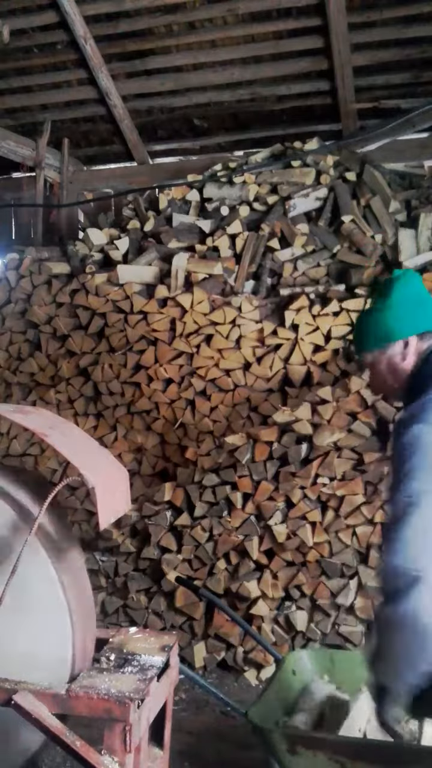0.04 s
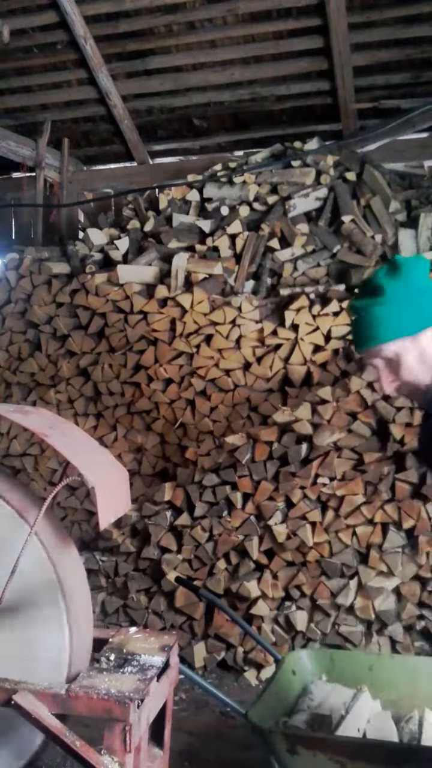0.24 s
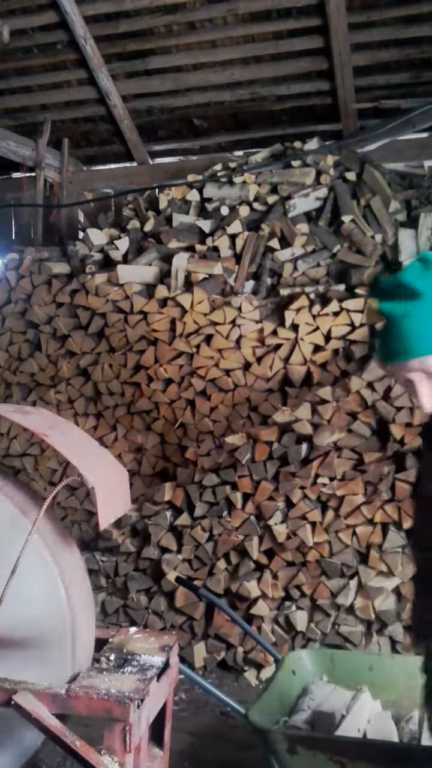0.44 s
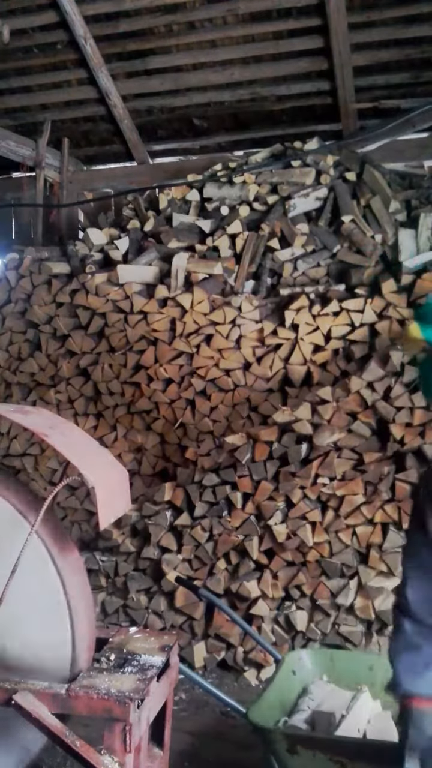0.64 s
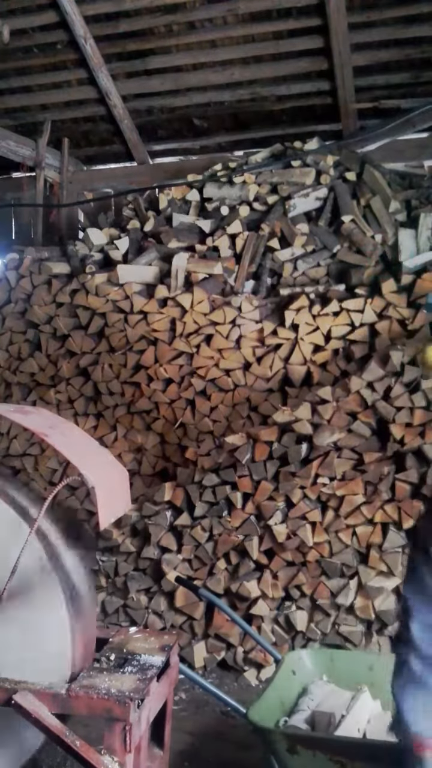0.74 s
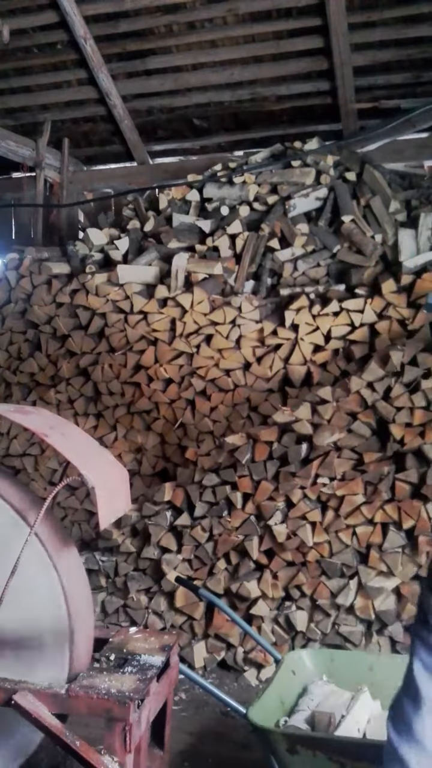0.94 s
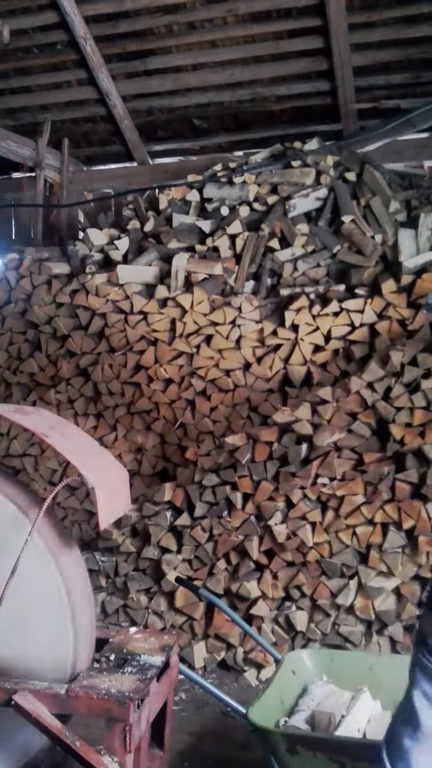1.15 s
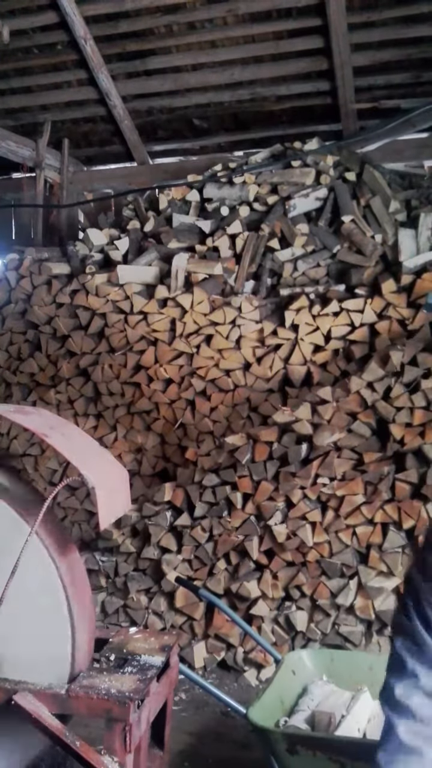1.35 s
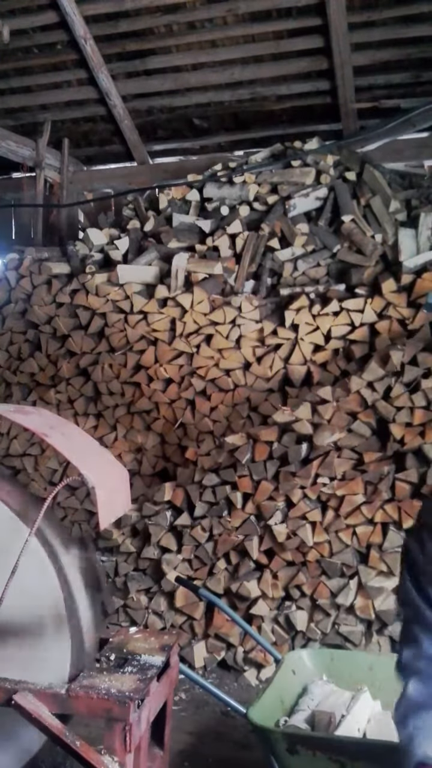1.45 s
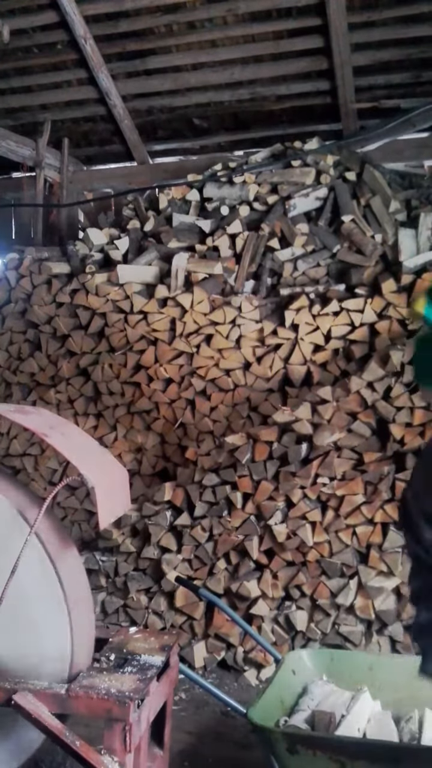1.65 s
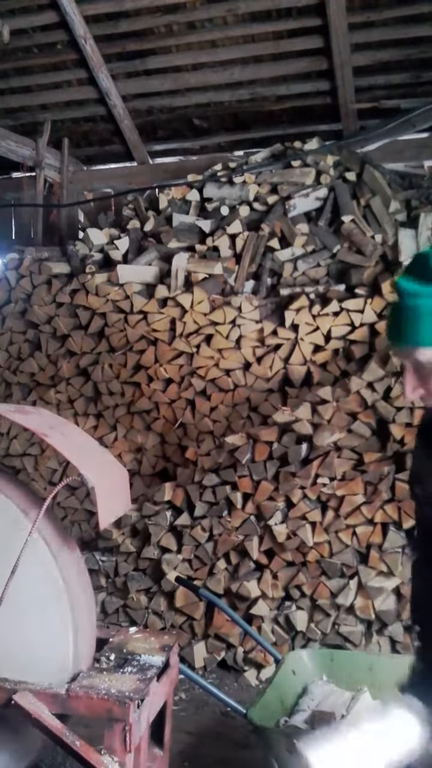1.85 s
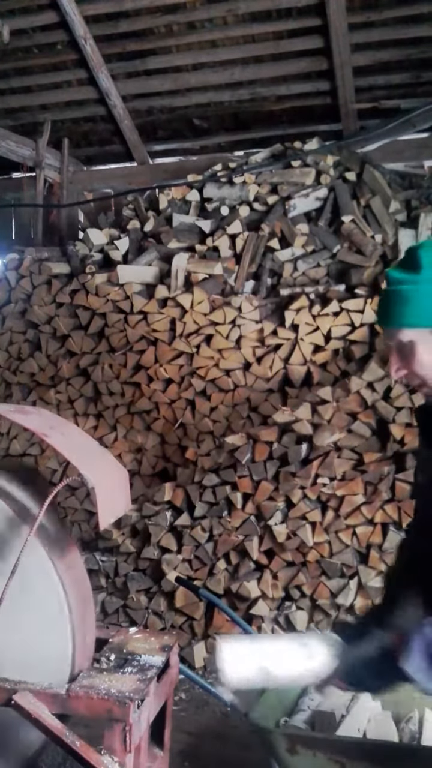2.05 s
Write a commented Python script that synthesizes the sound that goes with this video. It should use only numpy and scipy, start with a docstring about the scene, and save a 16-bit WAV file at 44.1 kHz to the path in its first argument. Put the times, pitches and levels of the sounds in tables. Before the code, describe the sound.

Split firewood tumbles into a wheelbarrow with a loud clatter, and the tray booms and rings out. A firewood machine idles quietly in the shed. Then come a sharp wooden knock, soft footsteps and a jacket rustle.

```python
"""A wooden shed: an armful of split firewood tumbles into a wheelbarrow. The logs clack,
their bark scrapes, and the struck tray booms and rings on. A firewood machine idles beside it:
belt and bearings rattle and ring its frame over a motor hum. The worker steps away on the
earth floor with a rustle of his jacket and a sharp knock of wood."""
import sys
import numpy as np
from scipy import signal
from scipy.fft import rfft, irfft
from scipy.io import wavfile
from scipy.ndimage import uniform_filter1d, minimum_filter1d

SR = 44100
rng = np.random.default_rng(int(sys.argv[2]) if len(sys.argv) > 2 else 0)


def generate_wav(sig):
    """Save sig (samples, or channels by samples) to the path in sys.argv[1] as 16-bit PCM at SR."""
    pcm = np.round(np.clip(np.atleast_2d(sig).T, -1, 1) * 32767).astype(np.int16)
    wavfile.write(sys.argv[1], SR, pcm)


N = 92610
T = np.arange(N) / SR

# belt and bearing spectrum: f/Hz, level/dB
WHIRR_SPECTRUM = [(30, -60), (60, -28), (100, -23), (160, -8), (450, -0.5), (720, -2), (1040, -4),
                  (1650, 0), (1850, -12.5), (2900, -28.5), (3550, -22.5), (4300, -35), (5800, -36.5),
                  (7800, -54), (20000, -73)]
# machine frame resonances: f/Hz, half width/Hz, level/dB
FRAME_MODES = [(458.7, 22.3, -6), (643.3, 11, -14), (720, 23, -12), (1161, 15, -11), (1271, 2.9, -9.5),
               (1591, 12, -12.5), (3503, 160, -26.5)]
# whirr and frame envelope: t/s, level/dB
IDLE_ENVELOPE = [(0, -44), (.45, -42), (.6, -39), (.75, -45.5), (.95, -44.5), (1.1, -41), (1.7, -39),
                 (2.1, -41.5)]
# logs landing: t/s, level/dB
LANDINGS = [(0.089, -21.5), (0.104, -12.5), (.111, -6), (.117, -7.5), (.130, -2.5), (.134, 3), (.141, 1.5),
            (.154, -2.5), (.163, -1.5), (.177, -5), (.186, -0.5), (0.1946, -5), (.203, -7.5), (.221, -6.5),
            (.231, -3), (0.258, -10), (.267, -8.5), (.277, -9), (.325, -14.5)]
# wood on tray: f/Hz, level/dB
CLATTER_SPECTRUM = [(60, -51), (120, -27), (250, -6.5), (480, -3), (700, -3.5), (1100, -4.5), (1450, 0),
                    (1700, -11), (2000, -26), (2500, -45), (3600, -36), (6000, -46), (16000, -68)]
# notes of colliding logs: t/s, f/Hz, level/dB
LOG_NOTES = [(.086, 1450, -15), (.130, 1890, -15.5), (.130, 1681, -14), (.175, 1468, -7.5),
             (.202, 1418, -6.5), (.221, 1471, -10), (.258, 1516, -12)]
# tray floor under heavy logs: t/s, f/Hz, level/dB
TRAY_BOOMS = [(.087, 176, -20), (.103, 290.4, -11.5), (.133, 516.7, -7.5), (.378, 167, -29)]
# tray modes: f/Hz, level/dB, t60/s
TRAY_MODES = [(166.7, -8.5, 0.47), (245.7, -12.5, 0.51), (269.4, -4.5, 0.724), (312, -7, 0.43),
              (407.3, 1, 1.35), (474.8, 7.5, 0.3), (506, 0, 0.4), (606, -8, 1.5), (763.3, 6.5, 0.89),
              (797, 0, 0.7), (929, -0.5, 0.51), (1400, 4, 0.64), (1462, 8, 0.47), (1596, 0, 0.29)]
# high tray resonances stirred by scraping: f/Hz, level/dB
SCRAPE_MODES = [(4060, -14.5), (4700, -16), (10500, -25)]
# logs sliding and settling: t/s, level/dB
SCRAPE_ENVELOPE = [(.078, -84), (.094, -51), (.145, -36.5), (.262, -40), (.32, -54.5), (.48, -65),
                   (.68, -74), (.9, -88)]
# bark friction: f/Hz, level/dB
BARK_SPECTRUM = [(1500, 5), (2700, 0.5), (3800, 4), (5700, -7.5), (8200, -8), (10300, -5.5), (13000, -20),
                 (16000, -23)]
# shed reverberation: f/Hz, t60/s
SHED_DECAY = [(100, 0.47), (400, 0.77), (1400, 0.38), (4000, 1), (10000, 0.22), (16000, 0.26)]
# bark rasp, a faint clink, then sleeve rasps: t/s, half length/s, f/Hz, half width/f, level/dB
RASP_EVENTS = [(.113, 0.019, 3340, 0.13, -40), (0.602, 0.012, 7200, .04, -72.5),
               (1.337, 0.014, 5760, 0.11, -62), (1.483, 0.0069, 9800, .06, -60),
               (1.577, 0.004, 10700, 0.11, -41.5), (1.682, 0.0099, 11100, .1, -60.5)]
# jacket rustle: t/s, level/dB
RUSTLE_ENVELOPE = [(1.15, -100), (1.34, -66.5), (1.41, -57), (1.53, -59), (1.585, -48.5), (1.655, -56),
                   (1.69, -57), (1.75, -69.5), (2.1, -84)]
# cloth friction: f/Hz, level/dB
CLOTH_SPECTRUM = [(1000, 3), (2000, 4), (3900, 5), (6000, 2), (7300, -6), (9700, 8), (11600, -2),
                  (13200, -8)]
# jacket folds flicking: t/s, level/dB
FOLD_FLICKS = [(1.496, -54), (1.523, -61), (1.5766, -45), (1.625, -53.5), (1.640, -53)]
# splinter tick: f/Hz, level/dB
TICK_SPECTRUM = [(400, -11), (2200, 3), (6000, -26), (9800, -23.5), (15000, -42)]
# wood knock and bounce: t/s, level/dB
KNOCK_HITS = [(1.3766, -3.5), (1.38, -9.5)]
# handled wood: f/Hz, level/dB
KNOCK_SPECTRUM = [(60, -34), (300, -4.5), (650, 6), (1400, 2.5), (2000, -4.5), (2800, -28), (4500, -25.5),
                  (16000, -63)]
# footfalls: t/s, level/dB
FOOTFALLS = [(1.38, -9.5), (1.414, -9.5), (1.511, -16), (1.574, -12.5), (1.64, -22)]
# foot on earth: f/Hz, level/dB
STEP_SPECTRUM = [(50, -44), (145, -0.5), (210, 4), (320, -15), (2000, -56)]


def amp(db):
    """Decibels to gain."""
    return 10 ** (np.asarray(db) / 20)


def at_hz(points, hz):
    """Table lookup on a log-frequency axis."""
    f, value = np.transpose(points)
    return np.interp(np.log(hz + 1), np.log(f + 1), value)


def envelope(points):
    """Gain over time from (t/s, level/dB) points."""
    return amp(np.interp(T, *np.transpose(points)))


def decay(t60_s):
    """Exponential fade."""
    return np.exp(-np.log(1000) * T / t60_s)


def swell(at_s, half_s):
    """Gaussian rise and fall."""
    return np.exp(-((T - at_s) / half_s) ** 2)


def add(mix, at_s, sound):
    """Mixes a sound in, in place."""
    part = mix[round(at_s * SR):][:len(sound)]
    part += sound[:len(part)]


def colour(x, spectrum, size=4096):
    """Minimum-phase filter of unit energy."""
    log_gain = np.log(amp(at_hz(spectrum, abs(np.fft.fftfreq(size, 1 / SR)))))
    response = np.exp(np.conj(signal.hilbert(log_gain)))
    taps = np.fft.ifft(response).real[:size // 2]
    return signal.fftconvolve(x, taps / np.linalg.norm(taps))[:len(x)]


def unit_rms(x):
    """Scales to rms 1."""
    return x / np.sqrt(np.mean(x ** 2) + 1e-20)


def band(hz, half_width_hz):
    """Noise of rms 1 in one resonance; at 0 Hz, a random wobble."""
    detuning = (np.fft.rfftfreq(N, 1 / SR) - hz) / half_width_hz
    return unit_rms(irfft(rfft(rng.standard_normal(N)) / (1 + detuning ** 2), N))


def friction(spectrum, grain_db, grain_hz):
    """Stick-slip noise of rms 1."""
    rough = rng.standard_normal(N) * amp(grain_db * band(0, grain_hz))
    return unit_rms(colour(rough, spectrum))


def strikes(rows, t60_s, size=16384):
    """A dying scatter of contacts per (t/s, level/dB) row."""
    out = np.zeros(N)
    for at_s, db in rows:
        burst = rng.standard_normal(size) * decay(t60_s)[:size]
        for _ in range(2):
            whitened = irfft(np.exp(1j * np.angle(rfft(burst))))
            burst = whitened * decay(2 * t60_s)[:size]
        add(out, at_s, amp(db) * burst / np.linalg.norm(burst))
    return out


def pings(rows, t60_s, rise_s):
    """A damped sine per (t/s, f/Hz, level/dB) row."""
    out = np.zeros(N)
    shape = decay(t60_s) * (1 - swell(0, rise_s))
    for at_s, hz, db in rows:
        add(out, at_s, amp(db) * np.sin(2 * np.pi * hz * T) * shape)
    return out


def machine(hum_hz=103.4, beat_period_s=0.635, beat_peak_s=1.11):
    """Belt and bearings rattle and ring the frame; the motor hum swells and sinks."""
    frame = sum(amp(db) * band(hz, half_hz) for hz, half_hz, db in FRAME_MODES)
    whirr = friction(WHIRR_SPECTRUM, grain_db=1, grain_hz=68)
    hum_db = -66 + 5 * np.cos(2 * np.pi * (T - beat_peak_s) / beat_period_s)
    hum = amp(hum_db) * np.sin(2 * np.pi * hum_hz * T)
    return envelope(IDLE_ENVELOPE) * amp(-2) * (whirr + frame) + hum


def bark_scrape():
    """Sliding bark and splinters stir narrow, high tray resonances."""
    bark = friction(BARK_SPECTRUM, grain_db=2, grain_hz=200)
    sheen = sum(amp(db) * band(hz, 0.013 * hz) for hz, db in SCRAPE_MODES)
    return envelope(SCRAPE_ENVELOPE) * (bark + sheen)


def log_impacts():
    """Landing logs clack, sound their own notes and boom the tray floor."""
    clatter = amp(12.5) * colour(strikes(LANDINGS, t60_s=0.038), CLATTER_SPECTRUM)
    notes = pings(LOG_NOTES, t60_s=0.053, rise_s=0.0011)
    booms = pings(TRAY_BOOMS, t60_s=0.089, rise_s=0.0045)
    return clatter + notes + booms


def in_shed(x, reverb_db, onset_s=0.003):
    """Direct sound plus a diffuse tail, each band dying at its own rate."""
    hz, t, noise = signal.stft(rng.standard_normal(SR), SR, nperseg=256)
    fade = np.exp(-np.log(1000) * t / at_hz(SHED_DECAY, hz)[:, None])
    tail = signal.istft(noise * fade, SR)[1]
    tail *= np.minimum(T[:len(tail)] / onset_s, 1)
    return x + amp(reverb_db) * signal.fftconvolve(x, tail / np.linalg.norm(tail))[:N]


def tray_ring(settle_t60_s=0.46, smear_hz=19):
    """Landings feed each mode and jolt its phase; the load smears it until settled."""
    feed, tray = np.zeros((2, N))
    push = np.hanning(200)
    for at_s, db in LANDINGS:
        add(feed, at_s, amp(db) ** 2 * push / push.sum())  # energy
    shifting = np.sqrt(abs(signal.fftconvolve(feed, decay(settle_t60_s) ** 2)[:N]))
    for hz, db, t60_s in TRAY_MODES:
        energy = np.maximum(signal.fftconvolve(feed, decay(t60_s) ** 2)[:N], 0)
        jolt_rad = np.cumsum(feed / (energy + 1e-3) * band(0, 20))
        ring = np.sqrt(energy) * np.sin(2 * np.pi * (hz * T + rng.random()) + jolt_rad)
        smear = 0.39 * shifting * band(hz, smear_hz)
        tray += amp(db) * (ring + smear)
    return amp(-31.5) * tray


def rasps():
    """Bark brushes past, a faint clink sounds, later sleeves brush: short swells of narrow noise."""
    return sum(amp(db) * swell(at_s, half_s) * band(hz, share * hz)
               for at_s, half_s, hz, share, db in RASP_EVENTS)


def jacket():
    """Cloth rubs; its folds flick crisply."""
    flicks = sum(amp(db) * swell(at_s, half_s=0.0017) for at_s, db in FOLD_FLICKS)
    return (envelope(RUSTLE_ENVELOPE) + flicks) * friction(CLOTH_SPECTRUM, grain_db=2, grain_hz=70)


def handled_wood(tick_s=1.2542, tick_db=-18, t60_s=0.0045):
    """A splinter ticks; wood knocks and bounces."""
    tick = colour(strikes([(tick_s, tick_db)], t60_s), TICK_SPECTRUM)
    knock = colour(strikes(KNOCK_HITS, t60_s), KNOCK_SPECTRUM)
    return tick + knock


def footsteps():
    """Soft, low thuds on the earth floor."""
    return colour(strikes(FOOTFALLS, t60_s=0.45), STEP_SPECTRUM)


def scene():
    """All sources, mono."""
    idle = machine()
    load = bark_scrape() + in_shed(log_impacts(), reverb_db=-0.5) + tray_ring()
    worker = jacket() + in_shed(handled_wood(), reverb_db=-7) + footsteps()
    return (idle + load + rasps() + worker)[None]


def record(dry, ceiling=0.85, window_s=0.006, cutoff_hz=15850):
    """Peak limiter on the crash, then a low-pass."""
    size = round(window_s * SR)
    needed_gain = ceiling / np.maximum(abs(dry), ceiling)
    gain = uniform_filter1d(minimum_filter1d(needed_gain, size), size)
    lowpass = signal.firwin(511, cutoff_hz, window=("kaiser", 9), fs=SR)
    return signal.oaconvolve(dry * gain, lowpass[None], "same")


dry = scene()
out = record(dry)
generate_wav(out)
```